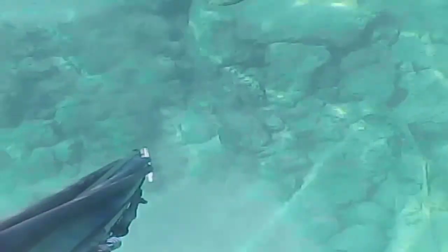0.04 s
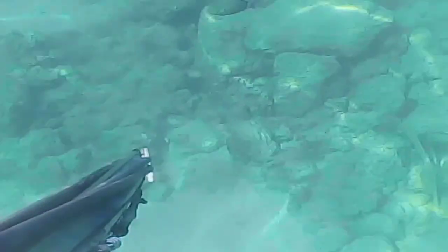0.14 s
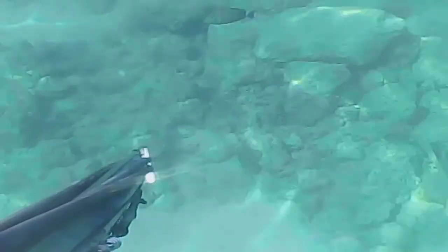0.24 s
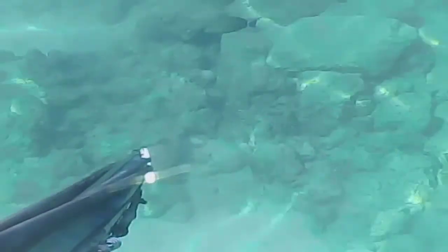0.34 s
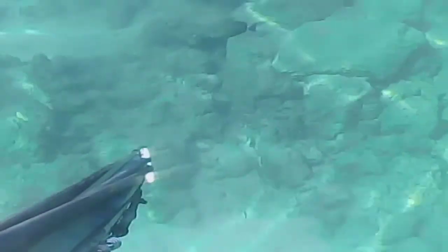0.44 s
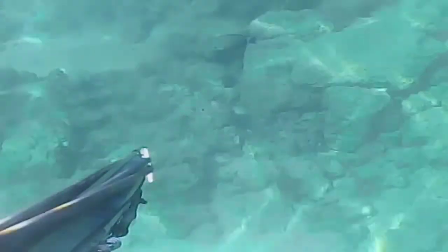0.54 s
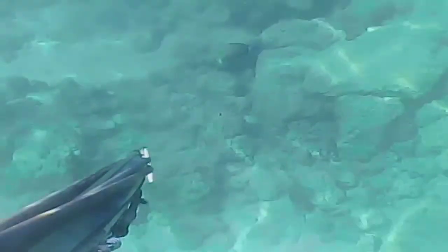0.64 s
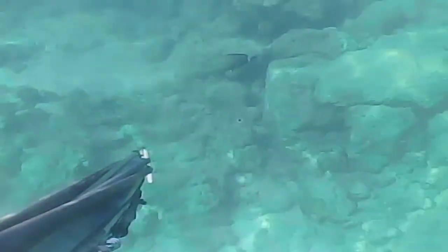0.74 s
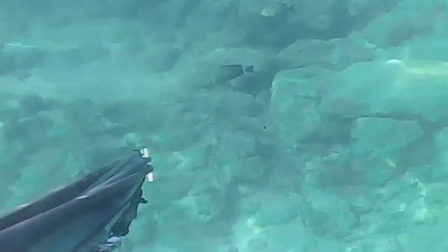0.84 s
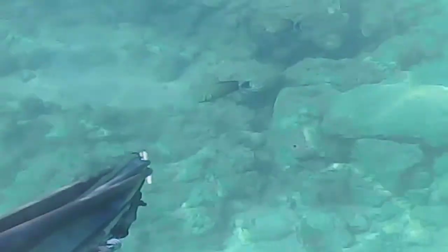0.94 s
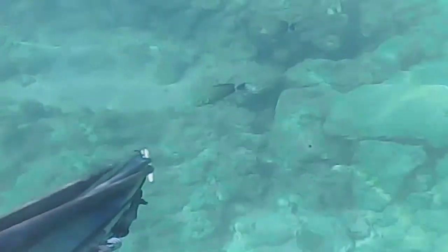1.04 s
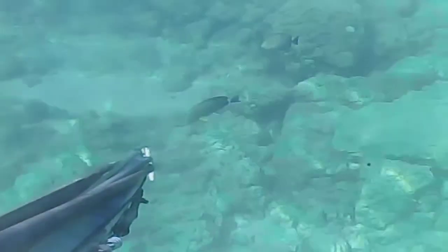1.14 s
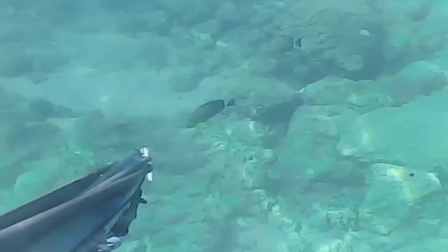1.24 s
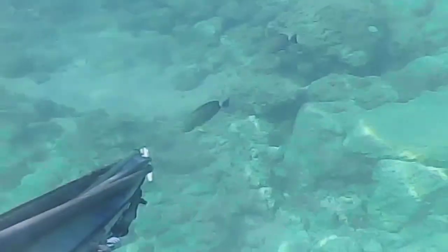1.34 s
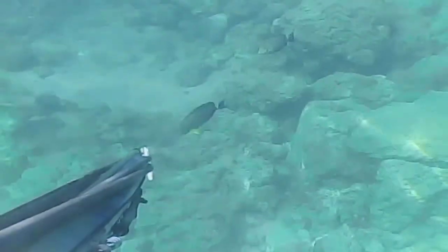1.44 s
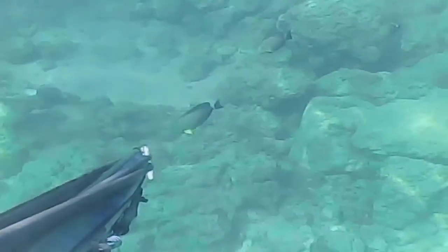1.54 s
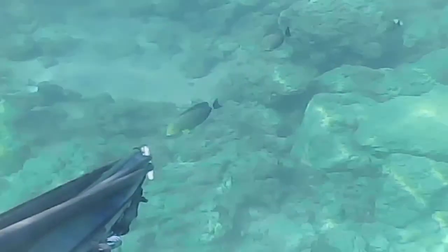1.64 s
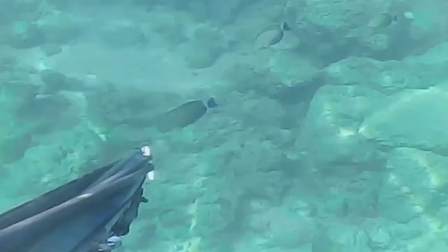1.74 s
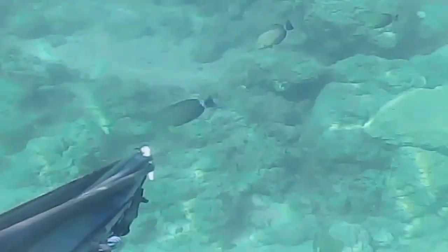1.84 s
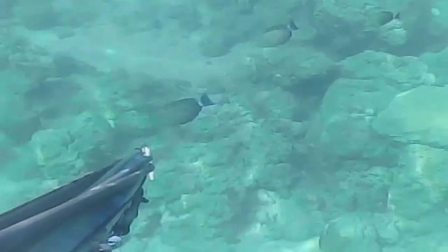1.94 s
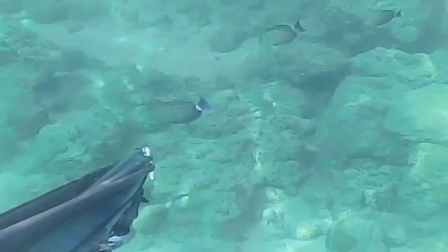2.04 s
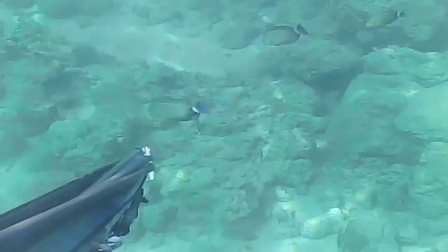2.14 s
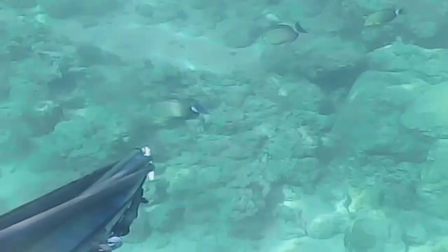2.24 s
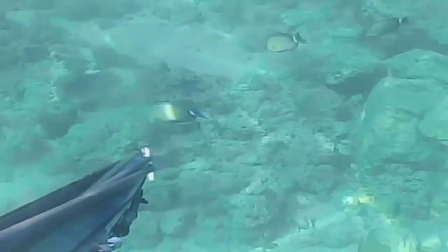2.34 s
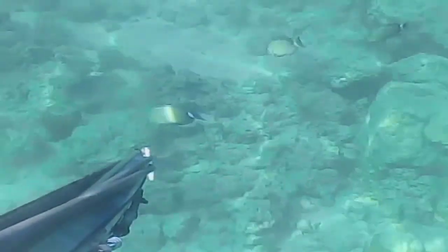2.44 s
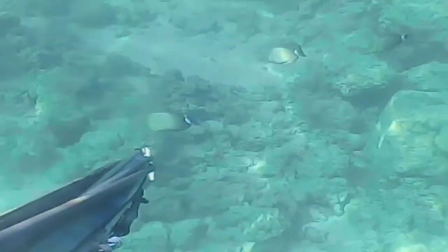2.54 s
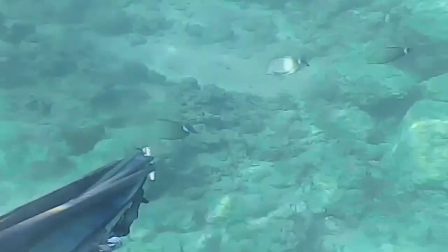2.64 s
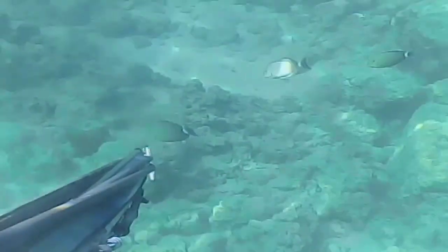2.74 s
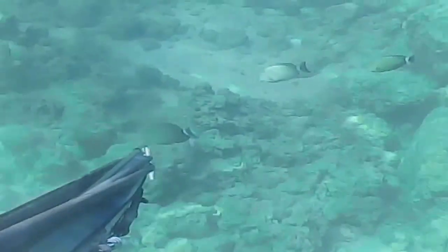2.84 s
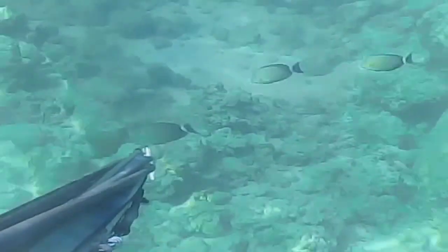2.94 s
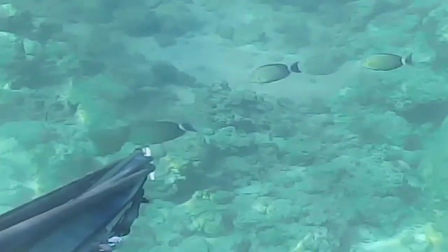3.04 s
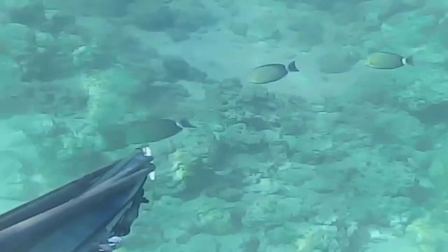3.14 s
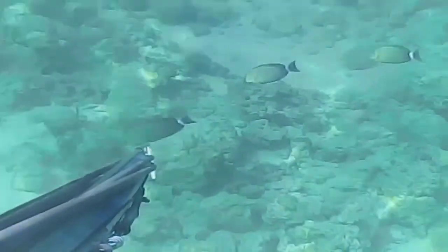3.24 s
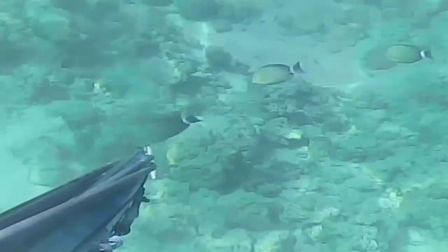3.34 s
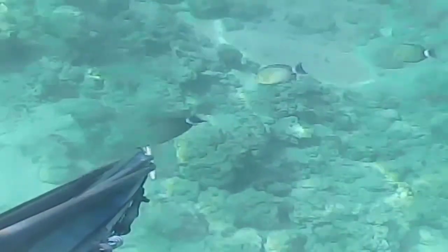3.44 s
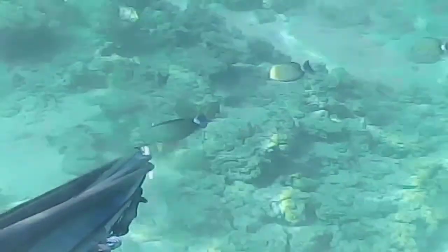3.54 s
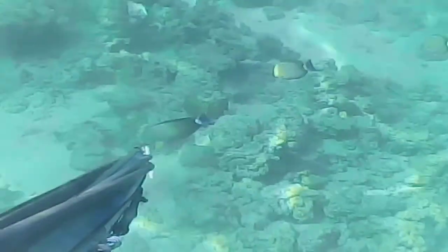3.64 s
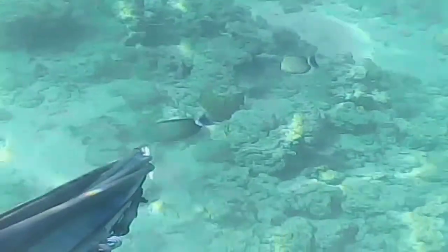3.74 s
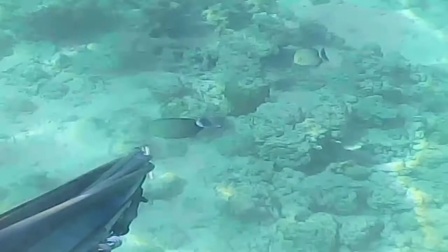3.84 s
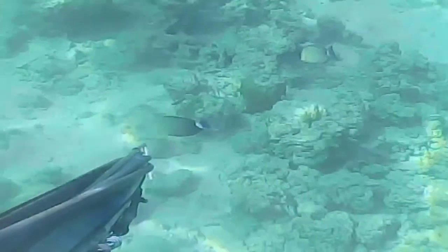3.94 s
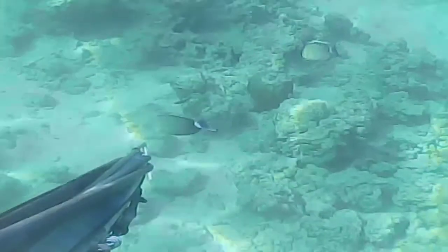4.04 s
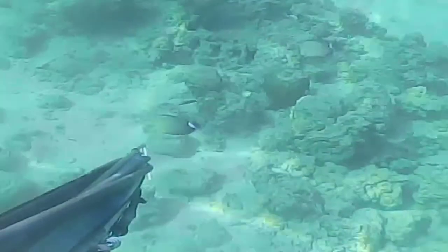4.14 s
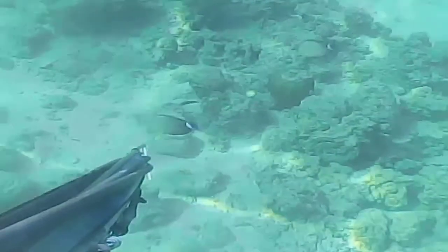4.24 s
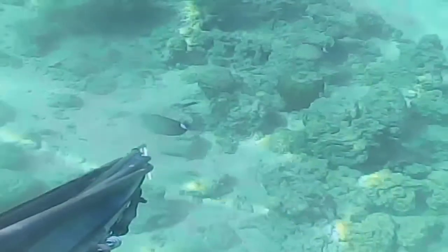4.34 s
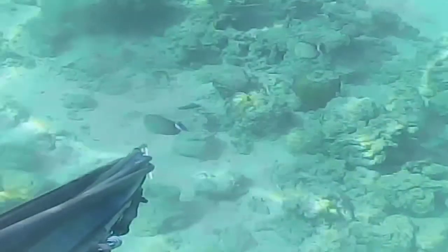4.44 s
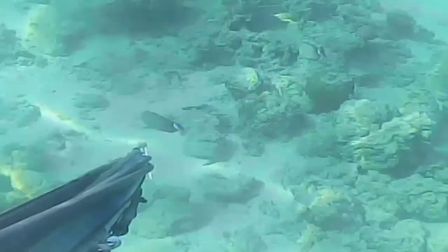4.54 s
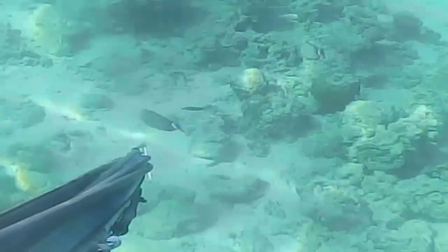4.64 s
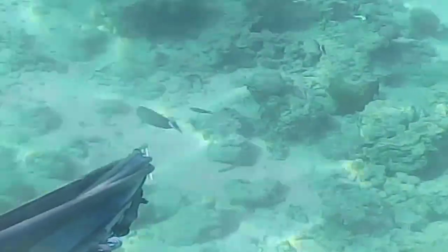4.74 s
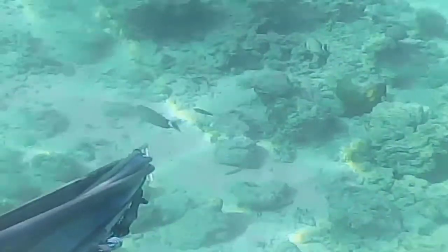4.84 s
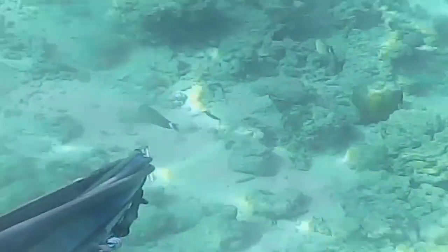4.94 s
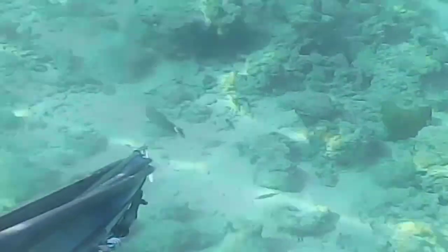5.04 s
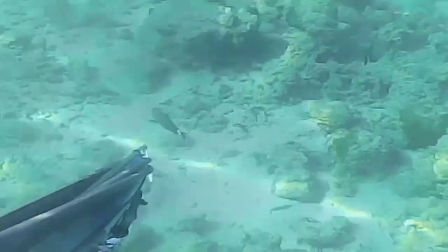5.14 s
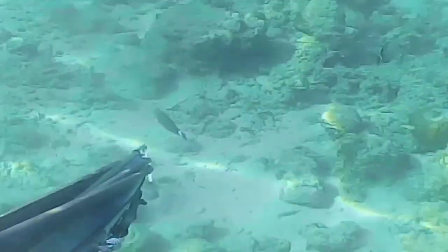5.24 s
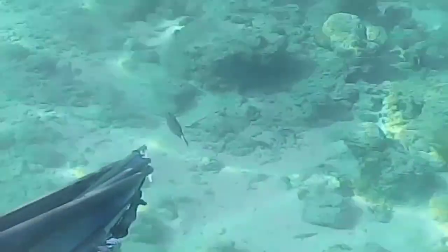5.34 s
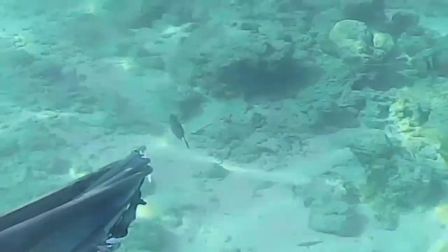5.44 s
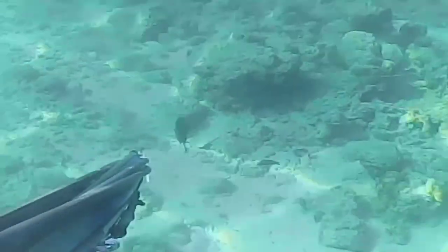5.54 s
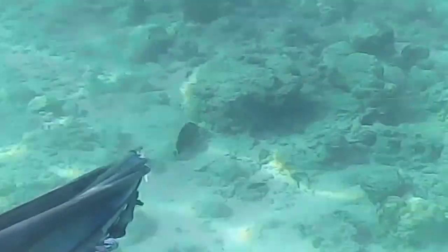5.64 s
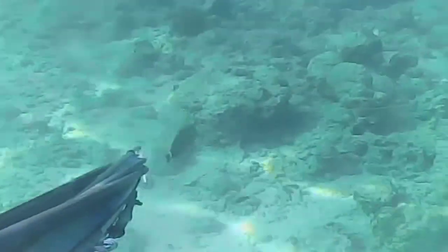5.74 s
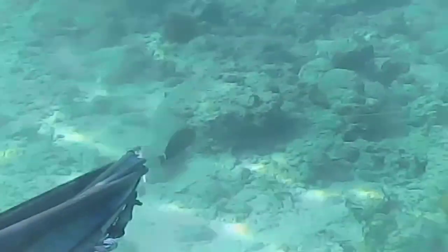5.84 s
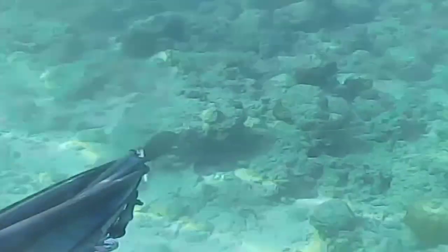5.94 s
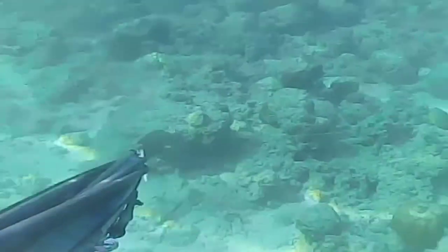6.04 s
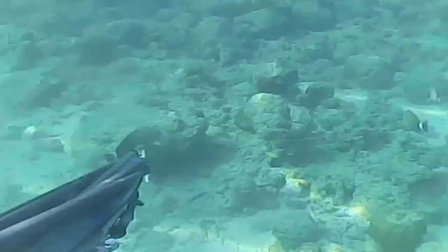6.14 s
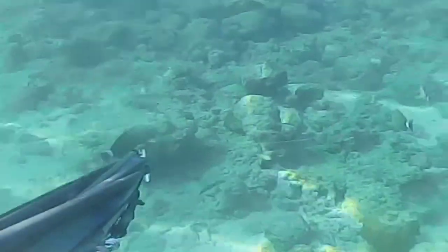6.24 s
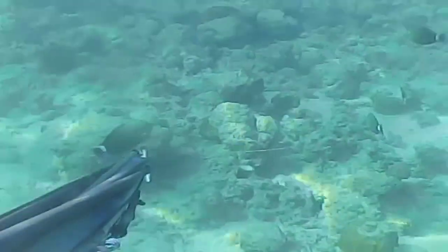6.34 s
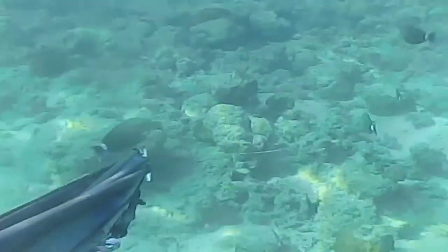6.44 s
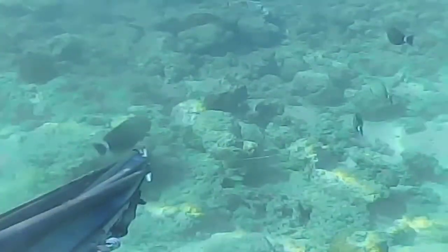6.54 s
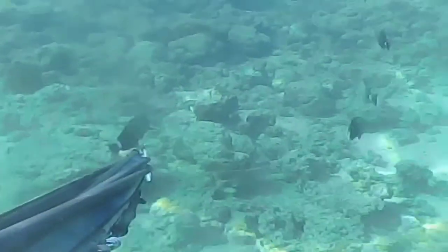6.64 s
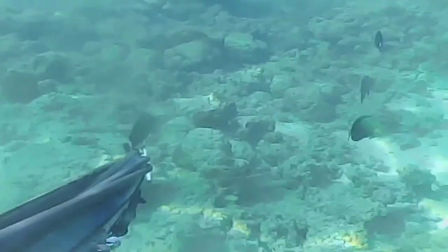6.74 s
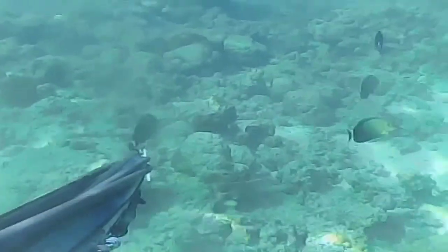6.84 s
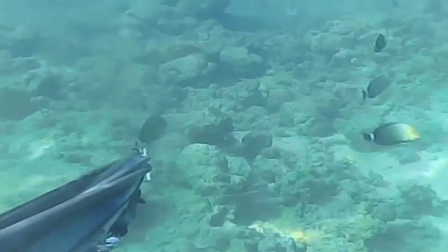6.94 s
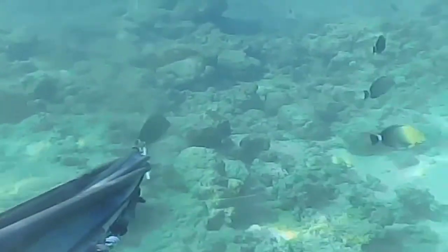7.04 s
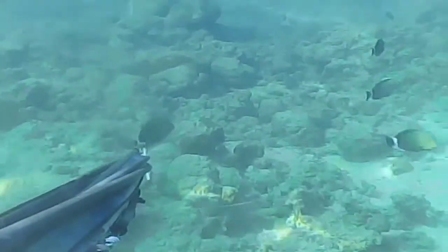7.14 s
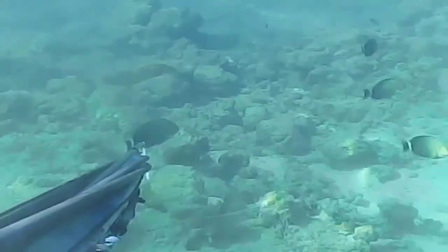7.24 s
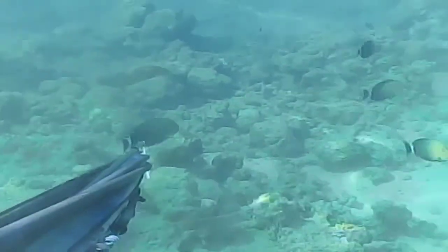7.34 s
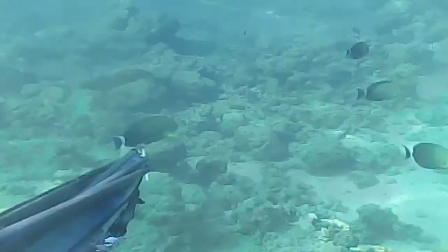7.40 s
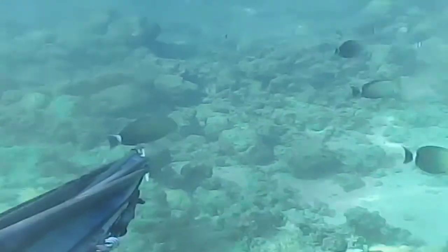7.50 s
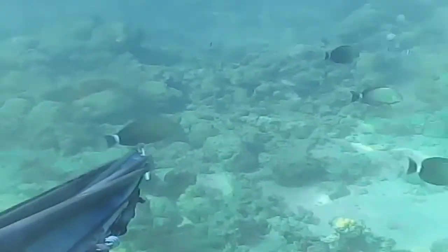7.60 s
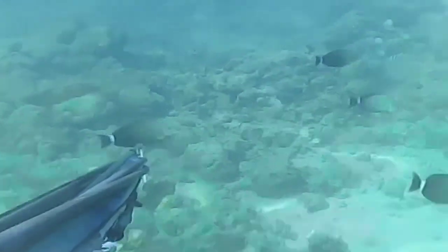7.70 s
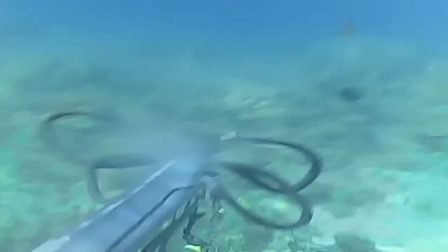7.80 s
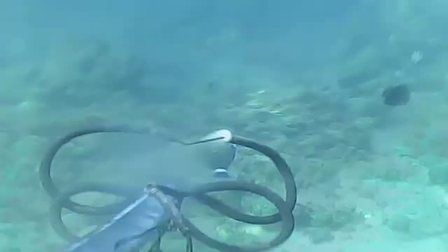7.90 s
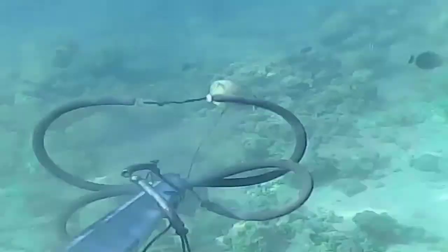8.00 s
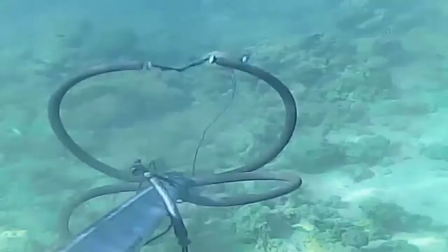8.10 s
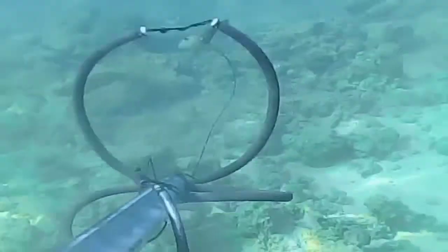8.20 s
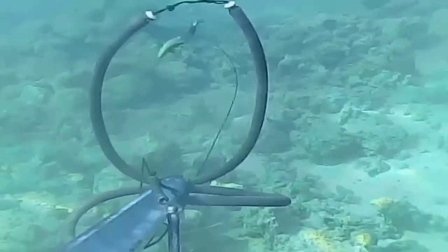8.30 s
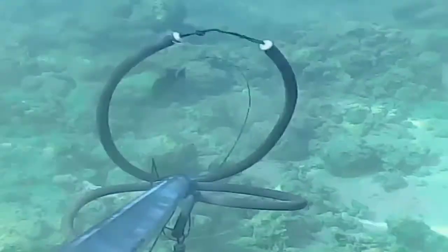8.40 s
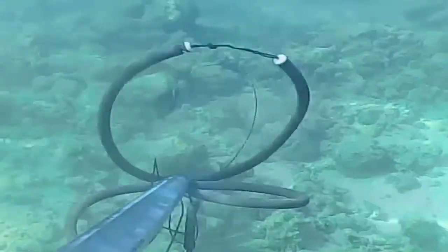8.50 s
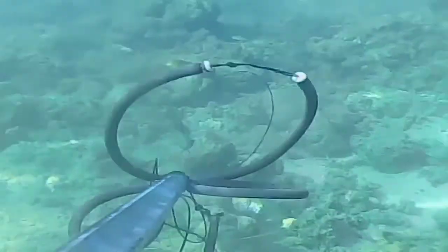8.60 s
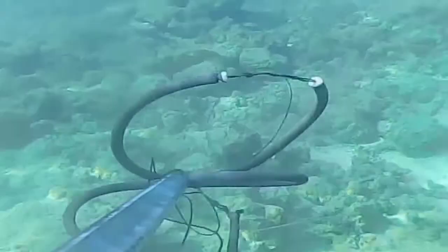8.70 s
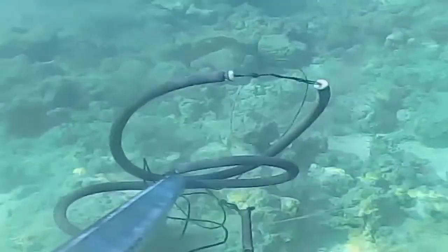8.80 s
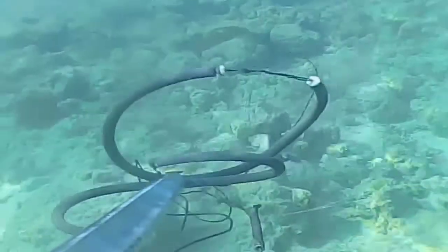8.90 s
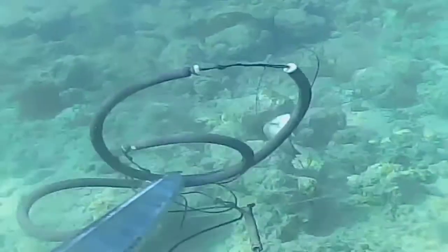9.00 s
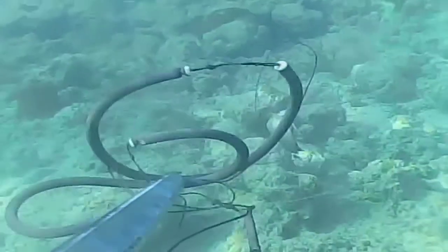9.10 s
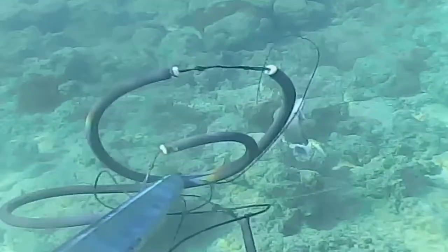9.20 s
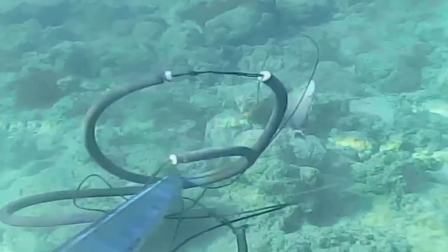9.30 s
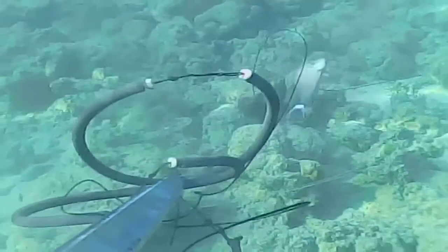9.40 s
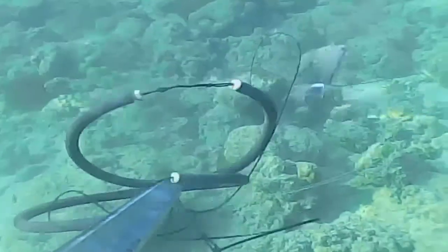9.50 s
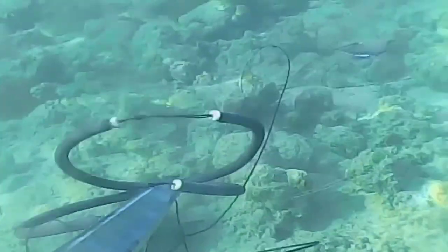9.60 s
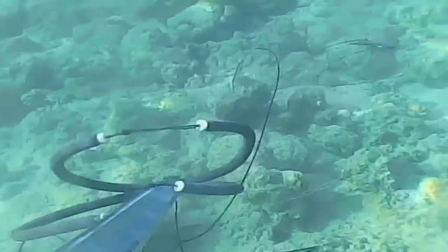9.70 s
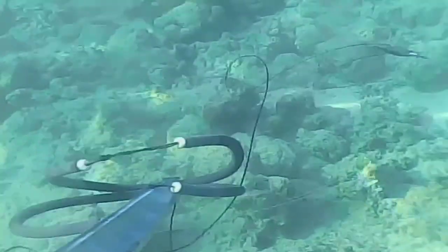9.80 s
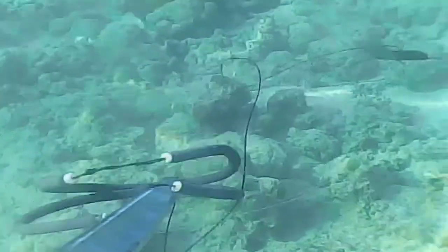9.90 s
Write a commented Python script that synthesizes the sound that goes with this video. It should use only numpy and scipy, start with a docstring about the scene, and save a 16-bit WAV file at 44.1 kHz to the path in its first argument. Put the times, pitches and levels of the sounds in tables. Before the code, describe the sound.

The sound is underwater and muffled, picked up by a microphone in a housing fixed to a speargun. A distant boat engine drones low with a slight throb, growing over the first four seconds and then holding, above a soft, steady wash of sea. Shrimp snap faintly throughout. Soft, dull knocks on the housing with tiny bubble blips come at about 0.6, 1.5 and 5.2 seconds, and a faint handling rumble begins around 6.5 seconds. At about 8.4 seconds the speargun fires with one very loud, overloaded crack, merging with a brief scrape and rattle of the shaft and a deep thump of recoil and churned water. It dies away within half a second. Line and rigging clink lightly until about 9.2 seconds, with dull knocks near 8.7 and 9.1. Faint rubbing, a bubble and the engine drone continue to about 10 seconds.

```python
"""A band speargun fires under water: impacts ring the barrel's modes, the gun recoils, the shaft
scrapes along its track, and line and rigging clink. The shot overloads a microphone in a housing
fixed to the gun. The hand rocks and rubs the housing, which knocks softly; small bubbles ring
and shrimp snap their claws. Behind them a distant boat engine drones in harmonics of its
cycle rate, over the steady wash of the sea."""
import sys
import numpy as np
from scipy import signal
from scipy.fft import rfft, irfft, next_fast_len
from scipy.io import wavfile

SR = 44100
rng = np.random.default_rng(int(sys.argv[2]) if len(sys.argv) > 2 else 0)


def master_out(mix):
    """Clip the mix to full scale and print it as 16-bit PCM to the path in sys.argv[1]."""
    frames = np.transpose(np.atleast_2d(mix))
    ceiling = np.clip(frames, -1, 1)
    pcm = np.round(ceiling * 32767).astype(np.int16)
    wavfile.write(sys.argv[1], SR, pcm)


N = 439236
T = np.arange(N) / SR

# impacts of sear, bands, shaft and wishbone: (t/s, relative ring level/dB, relative crack level/dB)
GUN_IMPACTS = [(8.366, -21.5, -29.5), (8.372, 13, -1), (8.378, 4, 0), (8.396, -7, 0.5), (8.407, -0.5, -13),
               (8.415, 0.5, -8), (8.458, -5, -11.5), (8.472, -13, -23), (8.490, -18, -25.5),
               (8.506, -22, -38)]
# modes of the gun with its housing: (f/Hz, relative level/dB, t60/s)
GUN_MODES = [(54.6, -21, 0.63), (73.3, -23.5, .22), (130, -22.5, .2), (155, -17.5, 0.12),
             (201.5, -25.5, .12), (276.7, -11.5, 0.072), (296.3, -15.5, 0.098), (354, -15, 0.1),
             (392, -14.5, .11), (453.3, -9.5, .08), (500, -5.5, .08), (559, 0.5, 0.042), (592, -6, 0.072),
             (668, -12, .06), (822, -17.5, .045), (1076, -20.5, 0.083), (1337, -21, 0.045),
             (1500, -23.5, 0.044), (1667, -21, .035), (2270, -19.5, .028), (2854, -18.5, .018)]
# friction spectrum of the shaft on its track: (f/Hz, relative level/dB)
SCRAPE_SPECTRUM = [(200, -4.5), (550, 8.5), (900, 2.5), (1600, -1.5), (2200, -10.5), (3100, -10),
                   (4200, -11), (7000, -31)]
# spectrum of churned water: (f/Hz, relative level/dB)
CHURN_SPECTRUM = [(25, -10.5), (45, -1.5), (60, -2), (82, 1), (110, -3.5), (160, -7.5), (300, -12.5),
                  (700, -29), (2000, -56.5)]
# contacts of trigger, wishbone and line with the gun: (t/s, relative level/dB)
RIGGING_CONTACTS = [(8.344, -31), (8.354, -33), (8.363, -25), (8.527, -32.5), (8.564, -37), (8.599, -27),
                    (8.608, -33.5), (8.645, -33), (8.693, -32.5), (8.776, -34), (8.808, -37.5),
                    (8.841, -48), (9.089, -42.5), (9.201, -49.5)]
# modes of the rigging: (f/Hz, relative level/dB, t60/s)
RIGGING_MODES = [(1650, -6, 0.044), (1920, 0.5, 0.045), (2070, -8, 0.042), (2450, -9, .04),
                 (2797, -8.5, 0.03), (3180, -9.5, .04), (3740, -1, .03), (3735, 3, 0.033)]
# dull knocks and gurgles at the housing: (t/s, level/dB, f/Hz, t60/s)
HOUSING_KNOCKS = [(0.025, -47.5, 487, 0.11), (0.590, -36.5, 261.5, .15), (0.590, -37, 570, 0.052),
                  (0.633, -40.5, 590, 0.04), (1.525, -42.5, 581, 0.076), (1.61, -44.5, 286, 0.14),
                  (1.692, -32.5, 470, .033), (5.22, -41, 288, 0.047), (5.222, -44, 470, .044),
                  (8.646, -35.5, 590, 0.049), (8.657, -32.5, 545, .086), (9.056, -21.5, 297, 0.042),
                  (9.470, -43, 556, 0.058)]
# small ringing bubbles: (t/s, level/dB, f/Hz, t60/s)
BUBBLE_TONES = [(0.115, -55, 1200, .07), (0.591, -45, 1520, .035), (1.526, -48, 1920, .044),
                (5.329, -53, 1570, .042), (5.750, -53, 1520, .035), (6.128, -49, 1460, .081),
                (8.646, -32.5, 1390, .031), (9.486, -42.5, 1495, .034)]
# movements of the hand: (t/s, duration/s, rocking level/dB, rubbing level/dB)
HAND_MOVES = [(0.585, .03, -68, -51.5), (1.5, .08, -46, -52.5), (6.5, 1.14, -52.5, -70),
              (8.6, 0.15, -43, -55), (9.02, 0.31, -52.5, -59), (9.377, 0.71, -64, -56.5)]
# spectrum of water and hand rubbing the housing: (f/Hz, relative level/dB)
RUB_SPECTRUM = [(35, -3), (75, 0), (150, -7), (300, -8.5), (600, -14.5), (850, -26.5), (1500, -28),
                (3000, -44.5)]
# claw snaps of nearby shrimp: (t/s, level before filtering/dB)
NEAR_SNAPS = [(0.591, -46.5), (1.2, -47.5), (1.284, -45.5), (1.525, -52), (1.834, -51.5), (2.36, -56),
              (3.095, -53), (3.158, -48), (3.79, -56), (4.208, -51), (4.318, -51.5), (6.07, -57),
              (9.486, -52.5), (9.908, -53)]
# the engine's main tone, harmonic 12 of its cycle rate: (t/s, f/Hz)
ENGINE_TONE = [(0, 157.9), (5.5, 157.9), (7.4, 157.2), (9.96, 156.7)]
# the engine's drone grows, then holds: (t/s, level/dB)
DRONE_LEVEL = [(0, -55.5), (2.2, -48), (4.2, -44.6), (7.6, -43.3), (9.96, -44)]
# engine harmonics: (multiple of the cycle rate, relative level/dB)
ENGINE_HARMONICS = [(4, -27.5), (6, -17.5), (7, -25), (9, -18.5), (10, -11), (11, -23.5), (12, -0.5),
                    (13, -16), (14, -11.5), (15, -25.5), (16, -21.5), (17, -25.5), (18, -28.5), (19, -28),
                    (25, -31), (27, -31), (34, -24.5), (36, -30), (38, -31), (41, -30), (42, -28),
                    (43, -31), (44, -28.5), (45, -19.5), (46, -25), (47, -31), (48, -25.5), (52, -32.5),
                    (74, -36), (97, -36), (105, -38), (145, -39)]
# spectral envelope of the weak harmonics between them: (f/Hz, relative level/dB)
WEAK_HARMONIC_SPECTRUM = [(140, 1.5), (260, 1.5), (340, -2.5), (520, 0), (640, -1.5), (700, -13)]
# spectrum of the sea through the housing: (f/Hz, relative level/dB)
WASH_SPECTRUM = [(15, -6.5), (45, -4.5), (100, 0), (170, -3), (260, -7), (350, -8.5), (600, -6), (720, -16),
                 (830, -26), (1500, -18.5), (2000, -22.5), (2200, -29.5), (3100, -28.5), (3350, -33.5),
                 (3800, -30.5)]
# resonances of the housing: (f/Hz, bandwidth/Hz, level/dB)
HOUSING_RESONANCES = [(612.3, 38, -69), (967.5, 89, -75.5), (1268, 170, -76), (1901, 210, -80)]

FIRE_S, RUN_S = 8.372, .088  # release of the bands; the shaft's time on its track
EXIT_S = FIRE_S + RUN_S
MAIN_HARMONIC = 12


def speargun():
    """Impact excitation: blows and fading shaft rattles ring the gun's modes as it recoils."""
    rattles = [(FIRE_S + t, -3 - 53.5 * t, -12 - 53.5 * t)  # fading by 53.5 dB/s
               for t in uneven_times(per_s=100, length_s=RUN_S)]
    impacts = GUN_IMPACTS + rattles
    water = churn()
    scrape = shaft_scrape(impacts, grains_per_s=6000, fade_db_per_s=84.5, crack_t60=.016)
    barrel = struck_modes([(s, db) for s, db, _ in impacts], GUN_MODES, spread_db=2.5)
    return barrel + scrape + recoil(hz=29.92, zero_phase_s=8.393) + water + band_flap(hz=70, db=-18)


def shaft_scrape(impacts, grains_per_s, fade_db_per_s, crack_t60):
    """Sliding friction: random micro-impacts weaken as the shaft runs out and peak at each blow."""
    envelope = shot_envelope(db=-19.5, attack_s=.002, tail_db=-17, tail_t60=.95)
    envelope *= from_db(-fade_db_per_s * np.clip(T - FIRE_S, 0, RUN_S))
    for s, _, crack_db in impacts:
        add(envelope, s, from_db(crack_db) * decay(T[:SR // 10], crack_t60))
    grains = (rng.random(N) < grains_per_s / SR) * rng.laplace(size=N)
    return envelope * coloured(grains, SCRAPE_SPECTRUM)


def recoil(hz, zero_phase_s):
    """Reaction to the launch: the gun swings in the hand as a damped oscillator."""
    envelope = shot_envelope(db=-3, attack_s=.03, tail_db=-12, tail_t60=.5)
    return envelope * np.sin(2 * np.pi * hz * (T - zero_phase_s))


def churn():
    """Turbulence: water stirred by the bands and shaft gives a burst of low noise."""
    envelope = shot_envelope(db=-9.5, attack_s=.03, tail_db=-17, tail_t60=.42)
    return envelope * coloured(rng.standard_normal(N), CHURN_SPECTRUM)


def band_flap(hz, db):
    """Damped oscillation: the slack bands flap once the shaft has left."""
    envelope = from_db(db) * swell(EXIT_S, hold_s=.04, attack_s=.03, t60=.26)
    return envelope * np.sin(2 * np.pi * hz * (T - EXIT_S))


def rigging(ring_db, chatter_db, chatter_t60):
    """Impact excitation: small hard parts and the running line clink, each with a brief chatter."""
    line_touches = [(EXIT_S + t, -44.5 - 46 * t)  # fading by 46 dB/s
                    for t in uneven_times(per_s=35, length_s=.5)]
    contacts = RIGGING_CONTACTS + line_touches
    power = np.zeros(N)  # incoherent bursts add in power
    for s, db in contacts:
        add(power, s, (from_db(db) * decay(T[:SR // 5], chatter_t60)) ** 2)
    chatter = signal.sosfilt(bandpass(1500, 4200), np.sqrt(power) * rng.standard_normal(N))
    clinks = struck_modes(contacts, RIGGING_MODES, spread_db=3)
    return from_db(ring_db) * clinks + from_db(chatter_db) * chatter


def knocks_or_bubbles(events, attack_s, pitch_rise, roughness):
    """Damped resonance: each tone rises slightly as it dies, with some noise around its pitch."""
    out, t = np.zeros(N), T[:SR // 3]
    for s, db, hz, t60 in events:
        warped_s = t + pitch_rise * t * np.minimum(t / t60, 2) / 2
        tone = np.sin(2 * np.pi * hz * warped_s)
        band = bandpass(hz / 1.4, hz * 1.4)
        noise = rms_one(signal.sosfilt(np.vstack([band, band]), rng.standard_normal(len(t))))
        envelope = from_db(db) * decay(t, t60) * (1 - np.exp(-t / attack_s))
        add(out, s, envelope * (tone + roughness * noise))
    return out


def handling(rocking_hz, width_hz):
    """Structure-borne noise: each hand movement rocks the gun and rubs water along the housing."""
    rocking_gain, rub_gain = from_db(-61.5), from_db(-74)  # gun held still
    for s, hold_s, rocking_db, rub_db in HAND_MOVES:
        rocking_gain = rocking_gain + from_db(rocking_db) * swell(s, hold_s, attack_s=.04, t60=.77)
        rub_gain = rub_gain + from_db(rub_db) * swell(s, hold_s, attack_s=.04, t60=.3)
    band = bandpass(rocking_hz - width_hz / 2, rocking_hz + width_hz / 2)
    rocking = rms_one(signal.sosfilt(band, rng.standard_normal(N + SR))[SR:])  # 1 s to settle
    return rocking_gain * rocking + rub_gain * coloured(rng.standard_normal(N), RUB_SPECTRUM)


def shrimp(t60, far_per_s, far_db):
    """Scattering: the reef smears claw snaps into noise bursts, a few near and many faint and far."""
    out, t = np.zeros(N), T[:SR // 10]
    far_snaps = [(when * N / SR, far_db - 8 * distance)
                 for when, distance in rng.random((int(far_per_s * N / SR), 2))]
    for s, db in NEAR_SNAPS + far_snaps:
        add(out, s, from_db(db) * rng.standard_normal(len(t)) * decay(t, t60))
    return signal.sosfilt(bandpass(1400, 4044), out)


def engine(dispersion_rad, whirr_waver_db, whirr_scatter):
    """Periodic firing: harmonics of the cycle rate form a throbbing drone and a whirr above it."""
    angle, drone, whirr = cycle_angle(), np.zeros(N), np.zeros(N)
    for k, db in ENGINE_HARMONICS:
        if k < 24:
            # dispersion in shallow water smears the firing pulses
            phase = dispersion_rad * (k - MAIN_HARMONIC) ** 2
            drone += from_db(db) * np.cos(k * angle + phase)
        else:
            # partly aligned phases make the whirr swell once a cycle
            phase = whirr_scatter * rng.uniform(-np.pi, np.pi)
            whirr += from_db(db + whirr_waver_db * drift(per_s=6.3)) * np.cos(k * angle + phase)
    drone = rms_one(drone) + from_db(-19) * weak_harmonics(angle)
    drone_db = curve(DRONE_LEVEL)
    whirr_db = -59.5 + .8 * (drone_db - drone_db.max())  # follows the drone over a smaller range
    return from_db(drone_db) * drone + from_db(whirr_db) * rms_one(whirr)


def weak_harmonics(angle):
    """Periodicity: noise repeated every engine cycle has a line at each multiple of the cycle rate."""
    cycle = rng.standard_normal(256)
    cycle_angles = np.linspace(0, 2 * np.pi, len(cycle), endpoint=False)
    return coloured(np.interp(angle, cycle_angles, cycle, period=2 * np.pi), WEAK_HARMONIC_SPECTRUM)


def cycle_angle():
    """Phase of the engine cycle in radians: the integral of its angular frequency."""
    return 2 * np.pi * np.cumsum(curve(ENGINE_TONE) / MAIN_HARMONIC) / SR


def sea(wash_db, throb_db, throb_decay_periods):
    """Forced resonance: over an even wash, the housing's noise bands swell at each engine knock."""
    out = from_db(wash_db) * coloured(rng.standard_normal(N), WASH_SPECTRUM)
    cycle_s = MAIN_HARMONIC / ENGINE_TONE[0][1]
    since_knock_s = (cycle_angle() / (2 * np.pi) % 1) * cycle_s
    for hz, width, db in HOUSING_RESONANCES:
        throb = 1 + from_db(throb_db) * np.exp(-since_knock_s * hz / throb_decay_periods)
        band = bandpass(hz - width / 2, hz + width / 2)
        out += from_db(db) * rms_one(signal.sosfilt(band, throb * rng.standard_normal(N)))
    return out


def struck_modes(impacts, modes, spread_db):
    """Modal superposition: each impact excites every damped mode with a randomly varied strength."""
    s, db = np.transpose(impacts)
    scatter_db = spread_db * rng.standard_normal((len(s), len(modes)))
    out, onsets = np.zeros(N), ((s - s.min()) * SR).astype(int)
    for k, (hz, mode_db, t60) in enumerate(modes):
        impulses = np.bincount(onsets, from_db(db + mode_db + scatter_db[:, k]), onsets.max() + SR // 2)
        radius, step = decay(1 / SR, t60), 2 * np.pi * hz / SR  # poles of the resonator
        feedback = [1, -2 * radius * np.cos(step), radius ** 2]
        ringing = signal.lfilter([0, np.sin(step)], feedback, impulses + 1e-18)
        add(out, s.min(), (-1) ** k * ringing)
    return out


def shot_envelope(db, attack_s, tail_db, tail_t60):
    """Two-slope decay: the gain holds while the shaft runs, then drops quickly to a slow tail."""
    body = swell(FIRE_S, RUN_S, attack_s, t60=.092)
    tail = from_db(tail_db) * swell(FIRE_S, RUN_S, attack_s, tail_t60)
    return from_db(db) * np.maximum(body, tail)


def swell(start_s, hold_s, attack_s, t60):
    """Linear attack, with exponential decay beginning hold_s after the start."""
    t = np.maximum(T - start_s, 0)
    return np.minimum(t / attack_s, 1) * decay(np.maximum(t - hold_s, 0), t60)


def decay(t, t60):
    """Exponential decay of 60 dB in t60 seconds."""
    return np.exp(-np.log(1000) * t / t60)


def coloured(x, spectrum):
    """Spectral shaping by (f/Hz, level/dB) points, rolling off outside them; rms 1."""
    hz, db = np.transpose(spectrum)
    size = next_fast_len(N)
    f = np.maximum(np.arange(size // 2 + 1) * SR / size, 1)
    skirts = np.minimum(f / hz[0], 1) ** 2 * np.minimum(hz[-1] / f, 1) ** 4
    gain = skirts * from_db(np.interp(np.log(f), np.log(hz), db))
    return rms_one(irfft(rfft(x, size) * gain, size)[:N])


def bandpass(low_hz, high_hz):
    """Sections of a band-pass filter."""
    return signal.butter(2, [low_hz, high_hz], "band", fs=SR, output="sos")


def uneven_times(per_s, length_s):
    """Jittered event times, one in each interval of 1 / per_s."""
    t = (np.arange(64) + rng.random(64)) / per_s
    return t[t < length_s]


def drift(per_s):
    """Slow random fluctuation; rms 1."""
    knots = rng.standard_normal(int(N / SR * per_s) + 2)
    return rms_one(np.interp(T * per_s, np.arange(len(knots)), knots))


def curve(points):
    """Linear interpolation of (t/s, value) points at every sample."""
    return np.interp(T, *np.transpose(points))


def add(out, s, sound):
    """Superpose a short sound at s seconds."""
    at = int(s * SR)
    out[at:at + len(sound)] += sound[:max(N - at, 0)]


def from_db(db):
    """Decibels to amplitude ratio."""
    return 10 ** (np.asarray(db) / 20)


def rms_one(x):
    """Scale to rms 1."""
    return x / np.sqrt(np.mean(x ** 2) + 1e-20)


def scene():
    """Superposition of all sources at the housing, in one channel."""
    background = engine(dispersion_rad=.3, whirr_waver_db=1.5, whirr_scatter=.6)
    background += sea(wash_db=-60, throb_db=1.5, throb_decay_periods=20)
    background += handling(rocking_hz=20.63, width_hz=4)
    background += shrimp(t60=.028, far_per_s=12, far_db=-60)
    knocks = knocks_or_bubbles(HOUSING_KNOCKS, attack_s=.0021, pitch_rise=.03, roughness=.43)
    bubbles = knocks_or_bubbles(BUBBLE_TONES, attack_s=.0028, pitch_rise=.05, roughness=.25)
    shot = speargun() + rigging(ring_db=-12.5, chatter_db=-2.5, chatter_t60=.034)
    return (shot + knocks + bubbles + background)[None]


def record(dry):
    """Overload: the microphone saturates, a low-pass dulls it, its overshoot clips; faint hiss."""
    limit, ceiling, sag, sag_s = .70, .745, .13, .014
    passband_hz, cutoff_hz, hiss_db = 3420, 15500, -97
    # the headroom sinks a little while the overload lasts
    pole = np.exp(-1 / (sag_s * SR))
    overload = signal.lfilter([1 - pole], [1, -pole], np.abs(dry) > limit)
    headroom = limit * (1 - sag * overload)
    saturated = headroom * np.tanh(dry / headroom)
    dull = signal.sosfilt(signal.butter(14, passband_hz, fs=SR, output="sos"), saturated)
    clipped = np.clip(dull, -ceiling, ceiling)
    hiss = from_db(hiss_db) * rng.standard_normal(N)
    return signal.sosfilt(signal.butter(16, cutoff_hz, fs=SR, output="sos"), clipped + hiss)


dry = scene()
out = record(dry)
master_out(out)
```